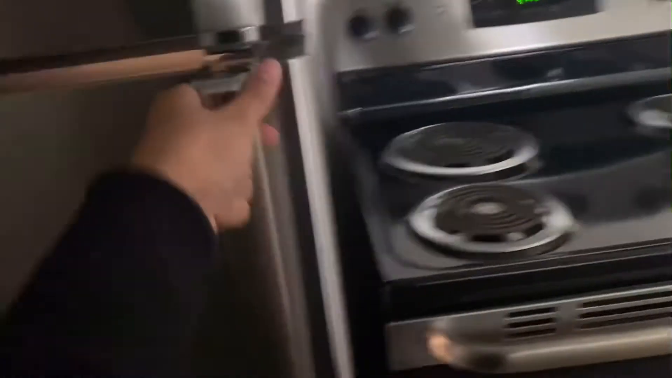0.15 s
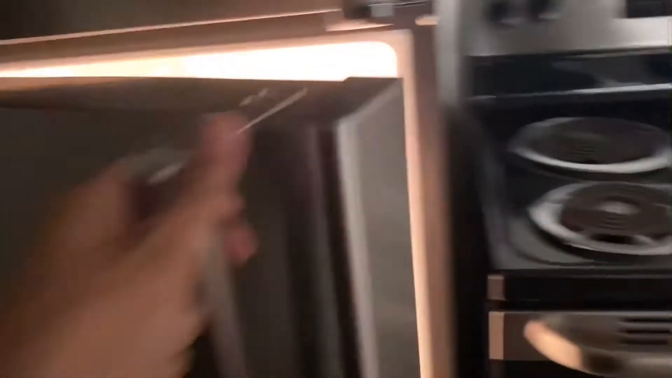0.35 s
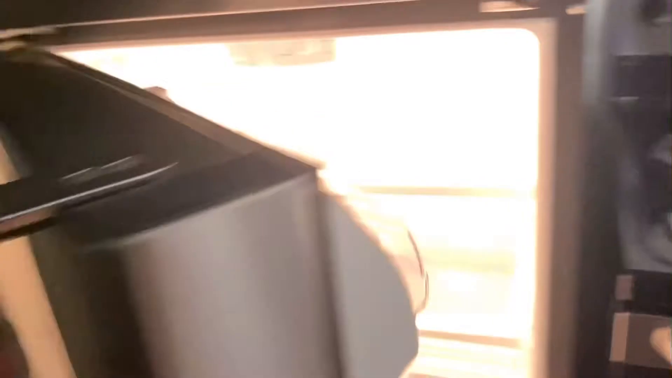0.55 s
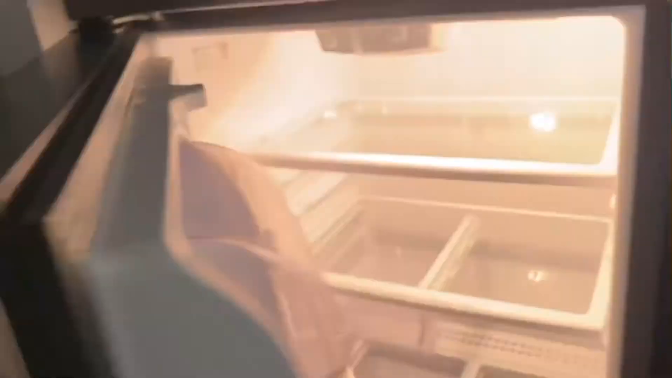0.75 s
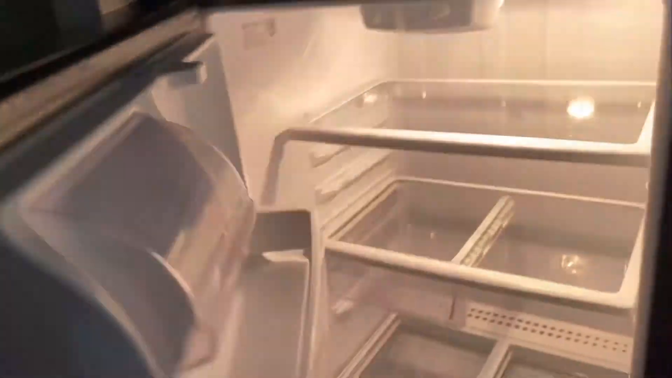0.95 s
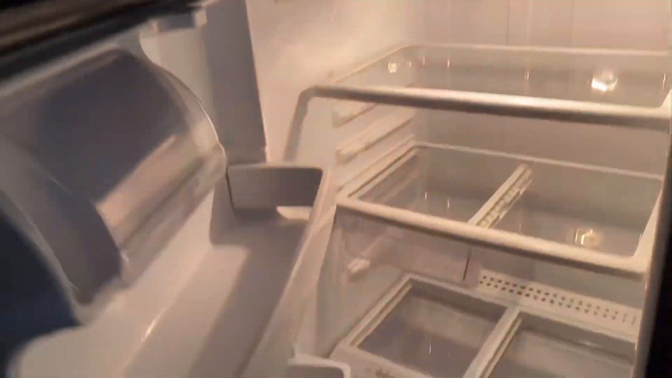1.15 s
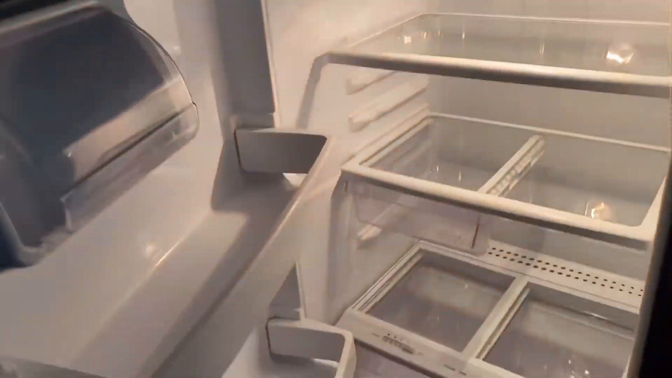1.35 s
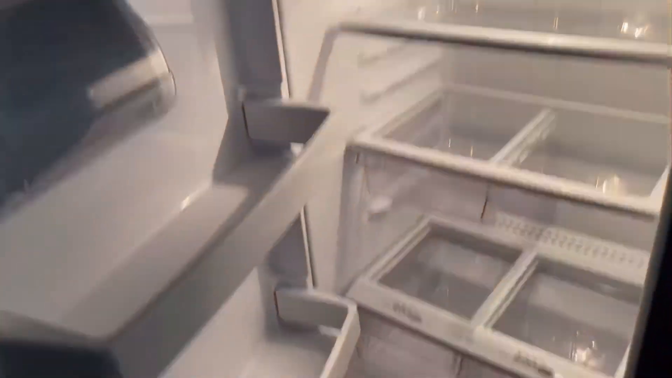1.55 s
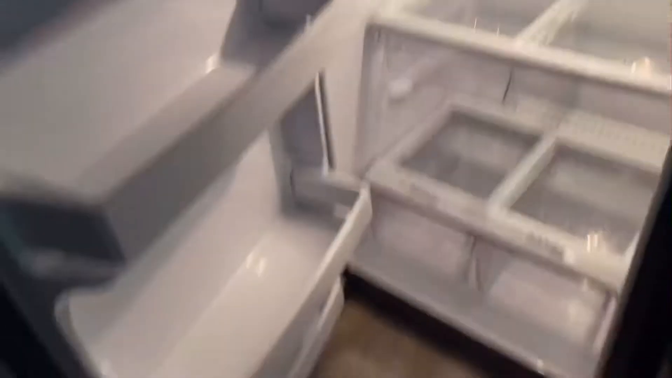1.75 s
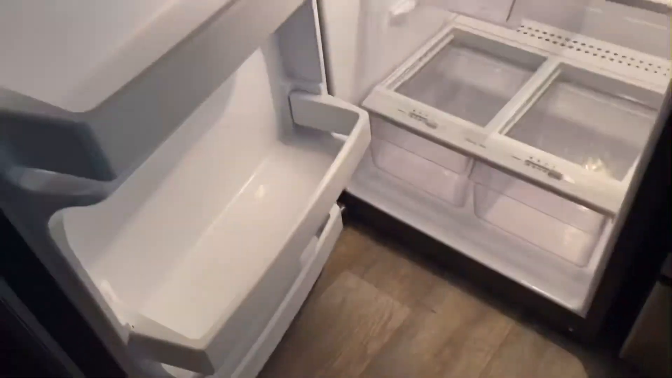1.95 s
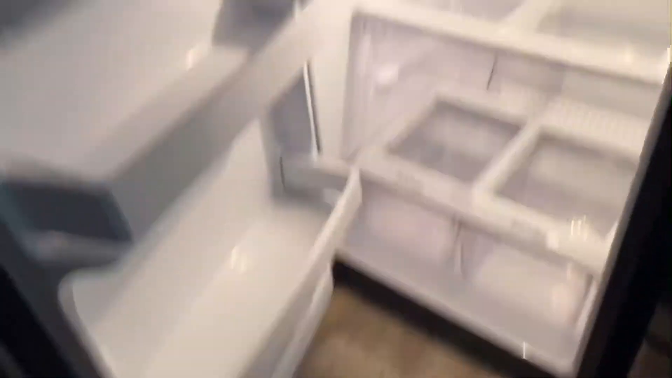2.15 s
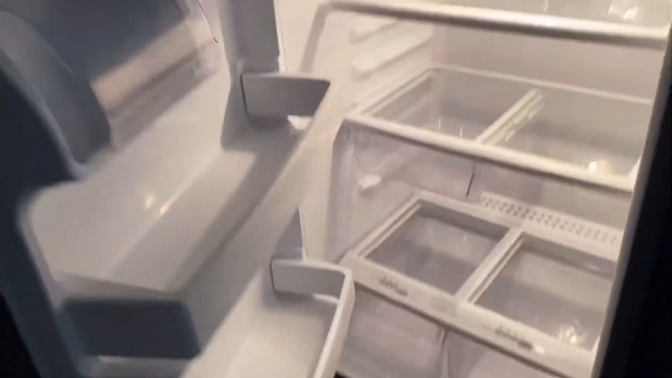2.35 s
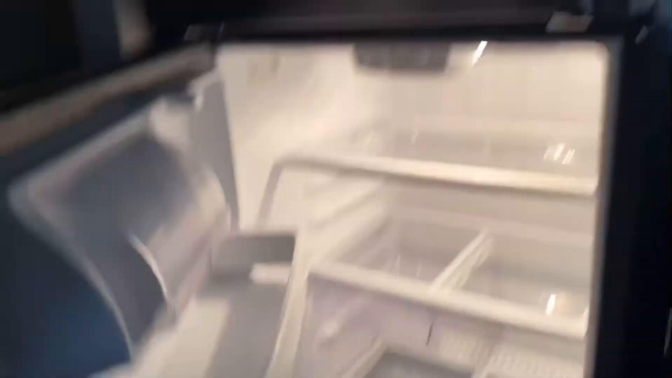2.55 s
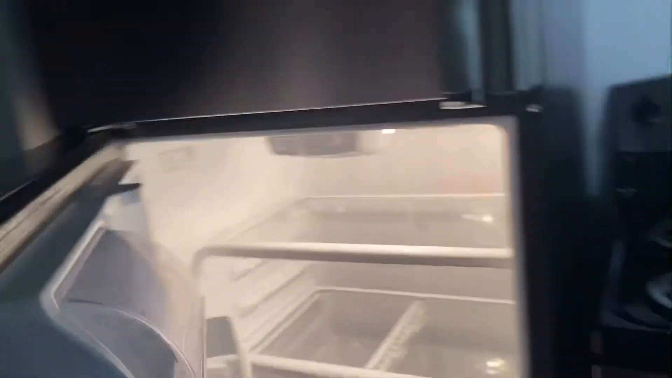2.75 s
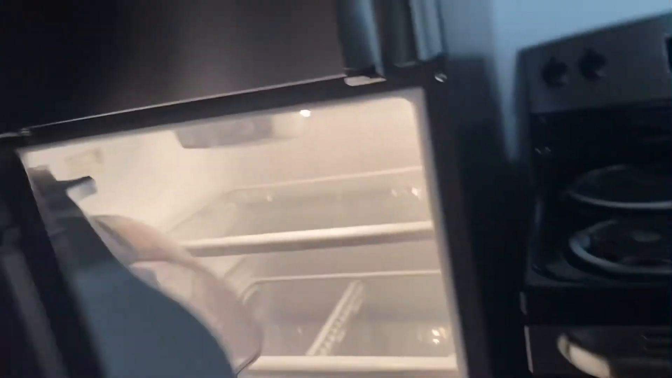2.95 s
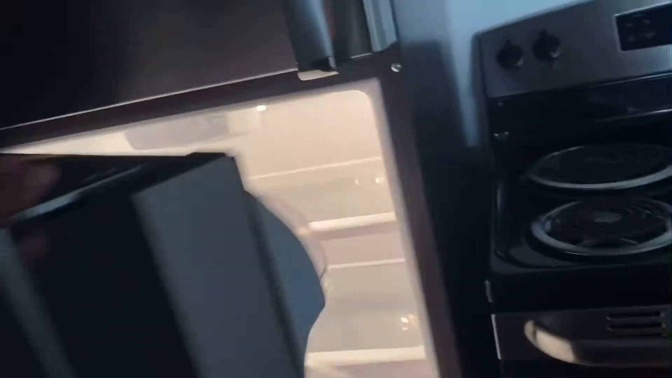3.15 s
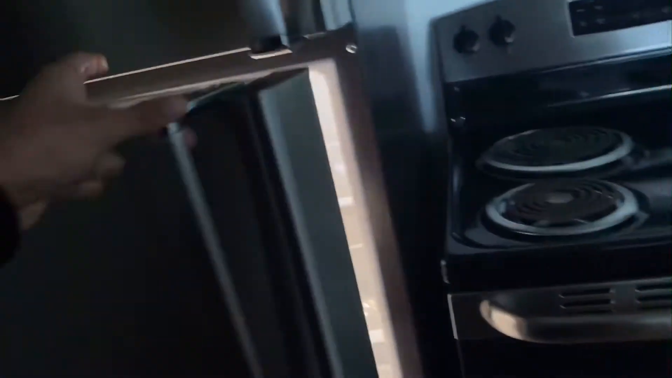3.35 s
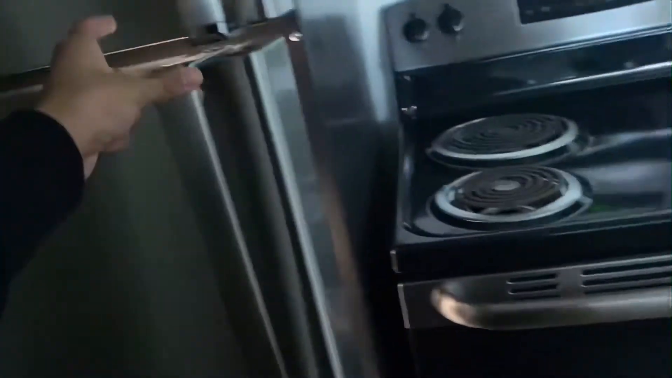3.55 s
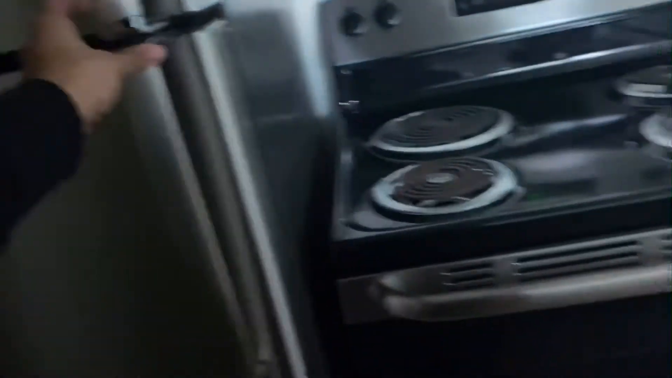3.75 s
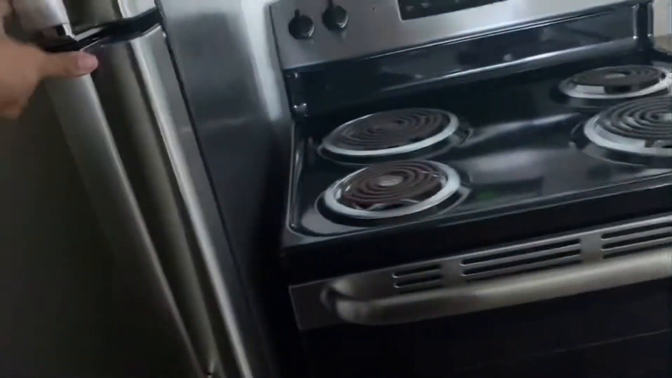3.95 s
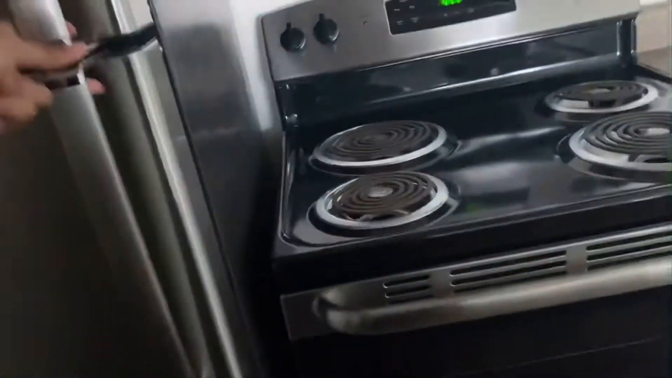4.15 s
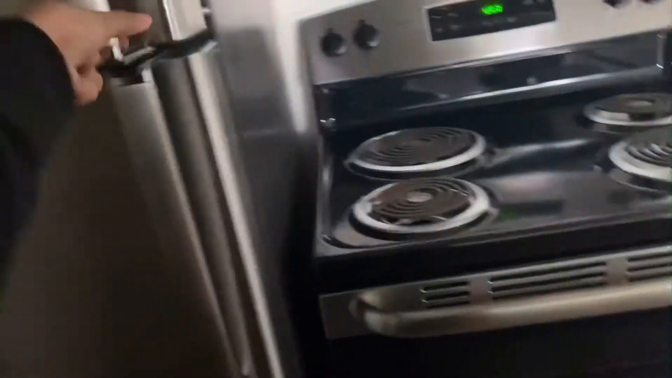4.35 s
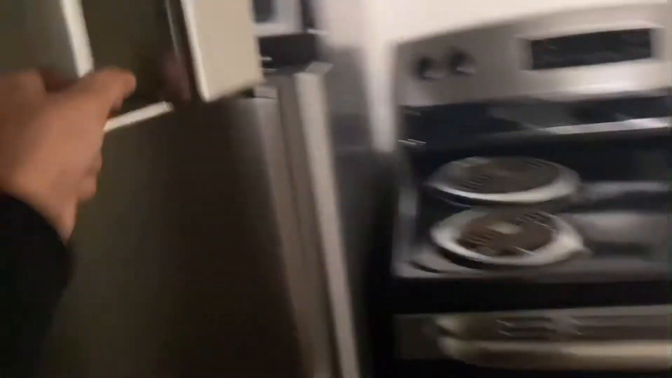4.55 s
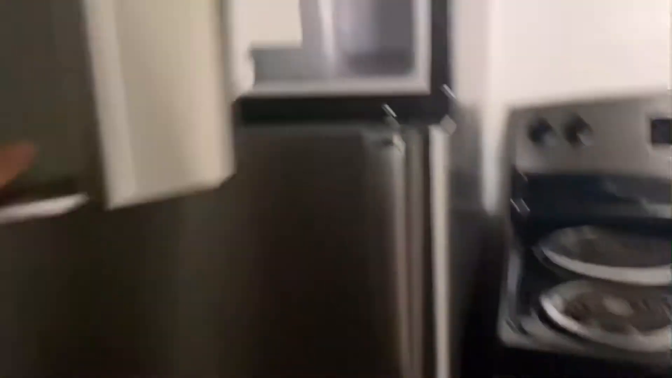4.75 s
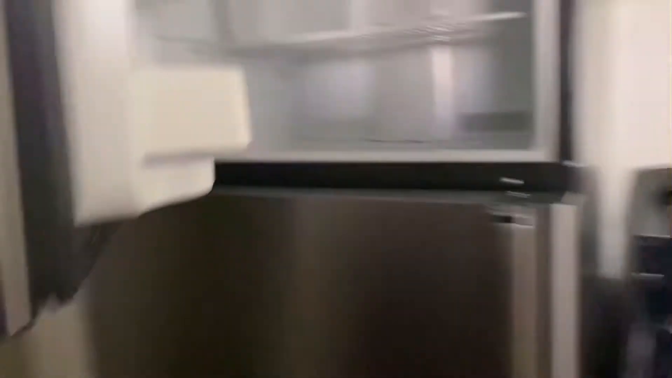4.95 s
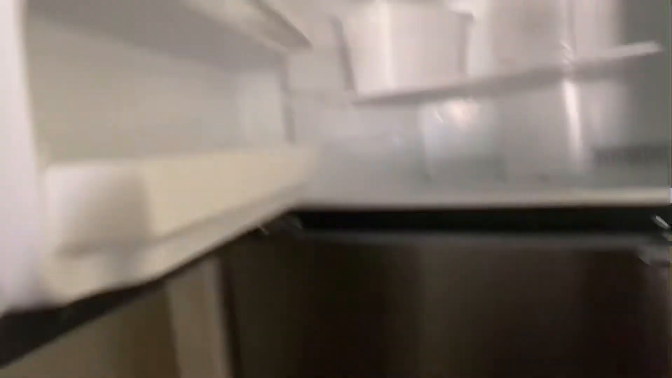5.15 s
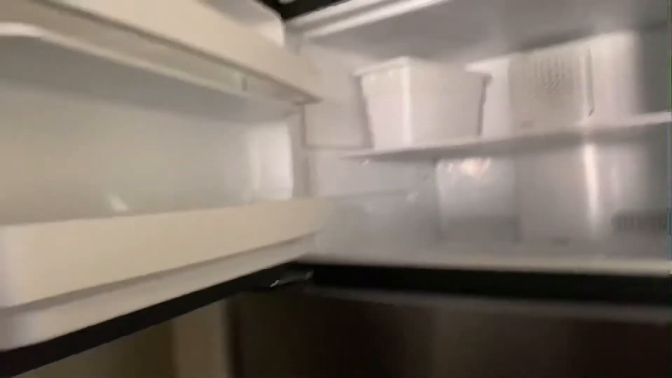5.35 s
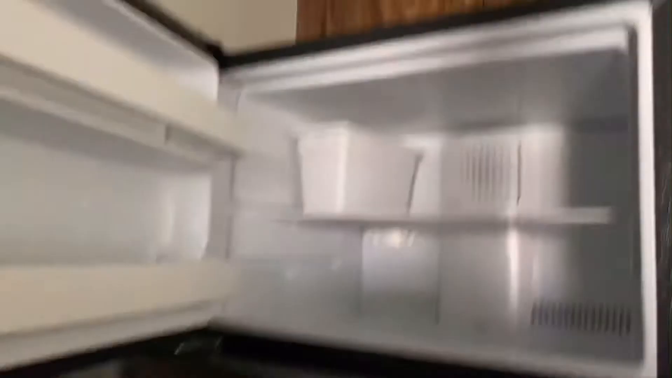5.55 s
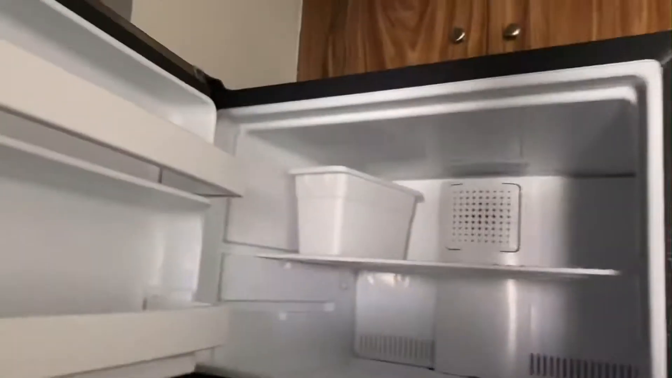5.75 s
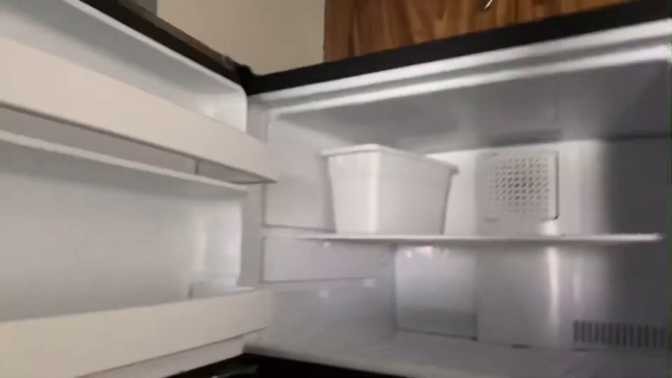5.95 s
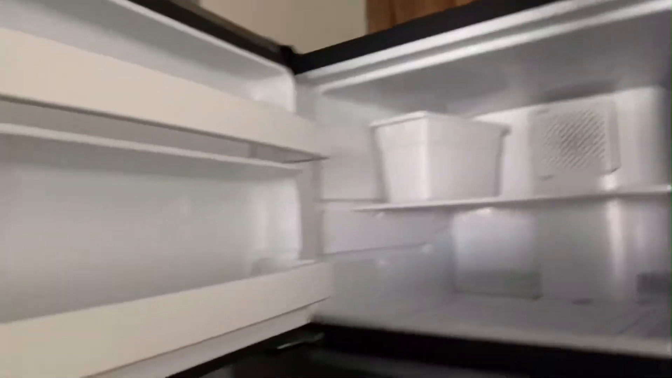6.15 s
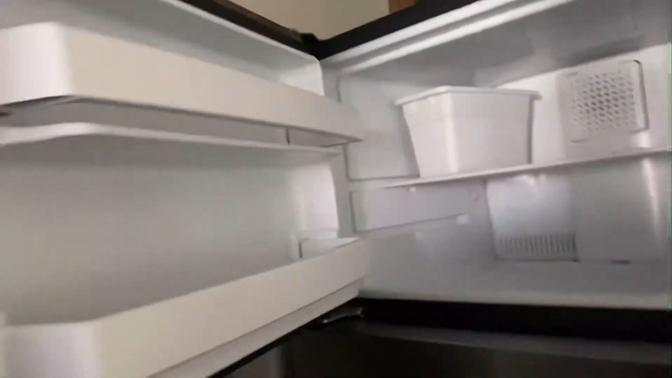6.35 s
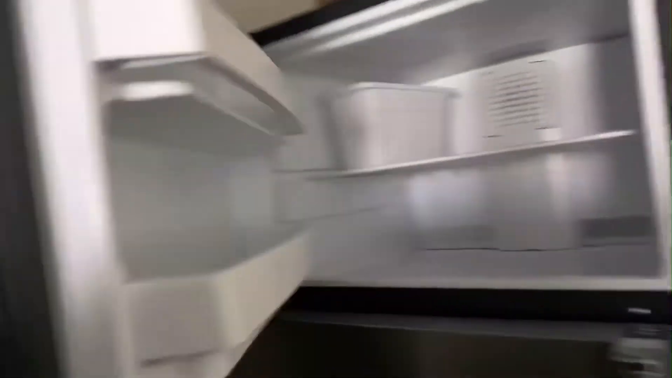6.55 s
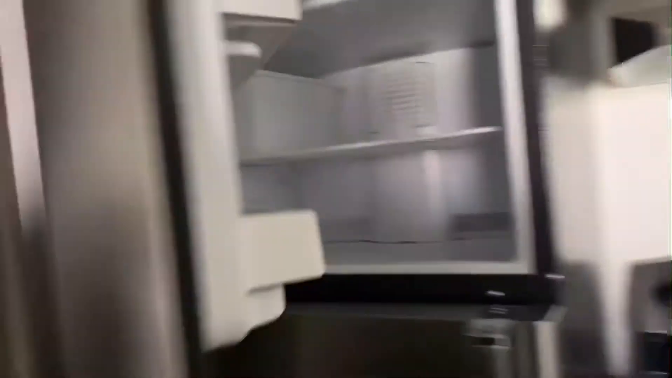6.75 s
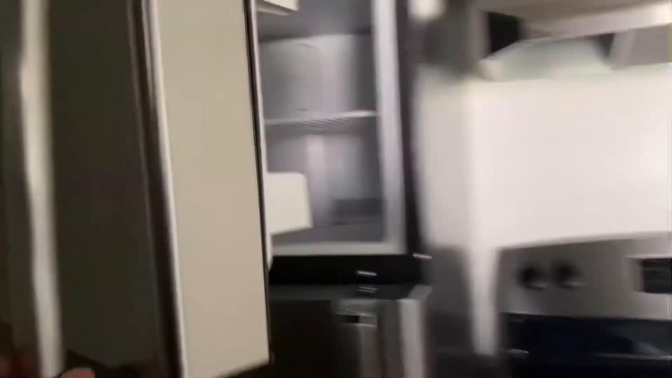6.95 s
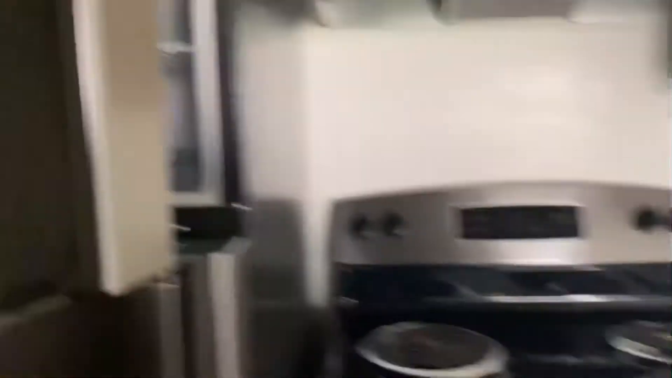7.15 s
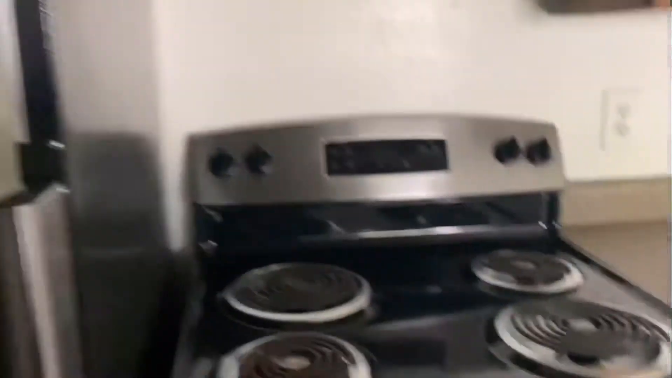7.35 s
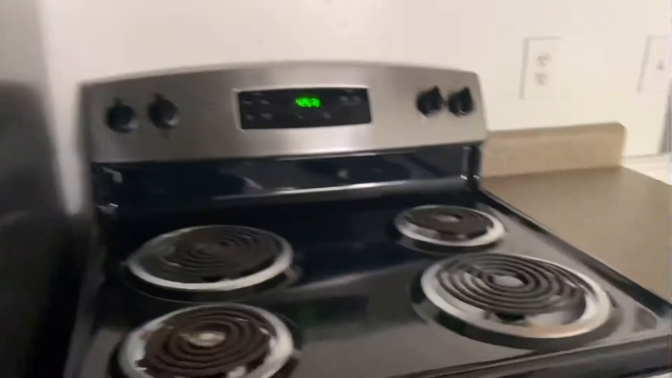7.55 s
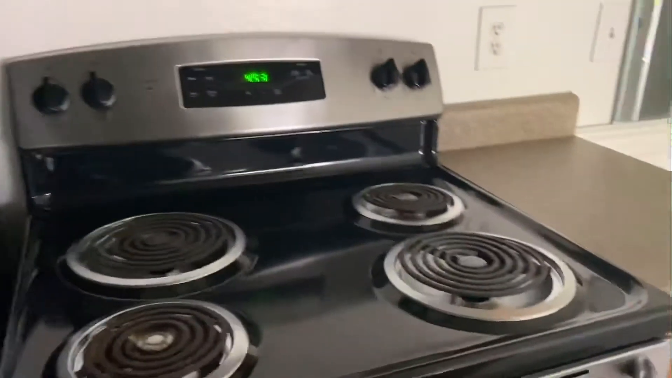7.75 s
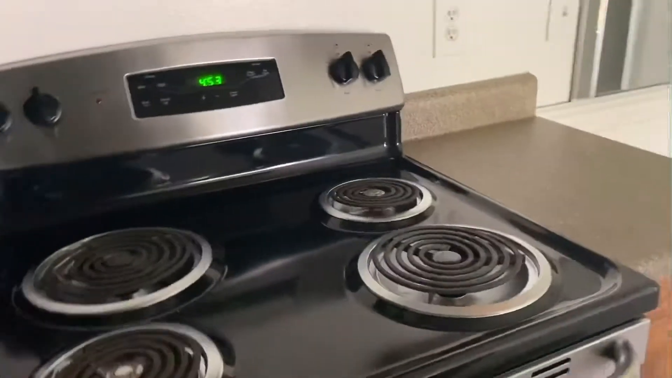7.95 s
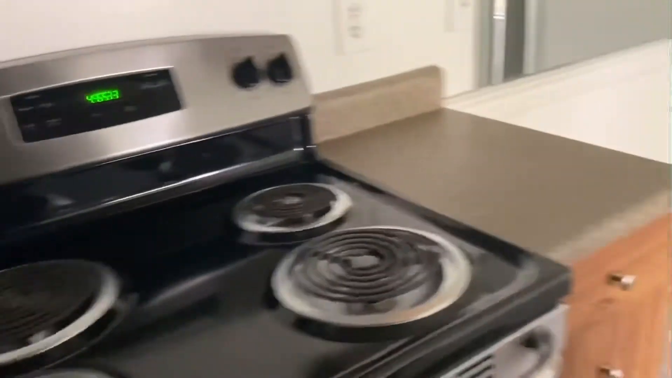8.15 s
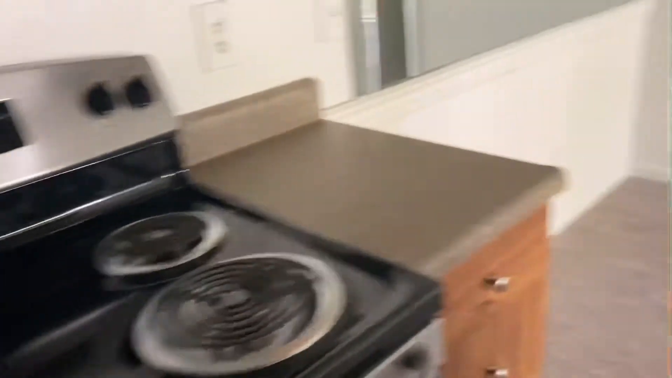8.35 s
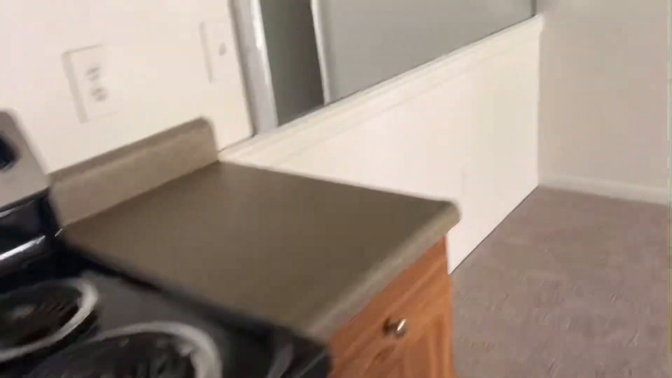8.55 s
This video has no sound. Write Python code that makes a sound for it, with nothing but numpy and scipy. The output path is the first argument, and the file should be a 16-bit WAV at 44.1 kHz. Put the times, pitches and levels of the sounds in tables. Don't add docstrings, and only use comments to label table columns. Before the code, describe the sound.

A bare, quiet kitchen heard close up in stereo, with low building rumble and soft room air. At 0.1 s the fridge opens with a dull low thud, a faint switch click and sleeve rustle. A thin, high shelf clink comes at 0.8 s, and a small plastic knock and tick at 1.2 s. Soft finger pats and muffled foot thuds follow from 1.5 to 2.6 s, then fine hinge ticks near 2.9 s. A palm pushes at 3.5 s, the switch clicks at 3.66 s, and at 3.72 s the fridge door slaps shut, loud and hollow, with shelf rattle and deep boom. At 4.27 s the freezer handle snaps brightly, followed by small plastic knocks and ticks until 4.9 s. It stays nearly quiet until a soft thud around 7.4 s. At 7.61 s the freezer slaps shut, brighter, with a short rattle and low boom, fading into rumble and slight rustle by 8.6 s.

```python
import sys
import numpy as np
from scipy import signal
from scipy.fft import rfft, irfft, next_fast_len
from scipy.io import wavfile
from scipy.ndimage import uniform_filter1d, map_coordinates

SR = 44100
rng = np.random.default_rng(int(sys.argv[2]) if len(sys.argv) > 2 else 0)


def materialize(psi):
    bounded = np.clip(np.atleast_2d(psi).T, -1, 1)
    quanta = np.round(bounded * 32767).astype(np.int16)
    wavfile.write(sys.argv[1], SR, quanta)


def nominal_scale(level):
    x = np.asarray(level, float) / 20
    return 10 ** x


N = 383405
AGE = np.arange(SR * 3 // 5) / SR


# t/s, peak level/dB, ring level/dB, shake level/dB, echo level/dB
FRIDGE_CLOSING = [
    (3.7171, -10.5, 0, -0.5, -3),
]
# f/Hz, level/dB, t60/s
FRIDGE_MODES = [(201.7, 0.5, 0.29), (244, -16, 0.14), (283, 3, 0.15), (359, -4.5, 0.22), (423, -4.5, 0.12),
                (544, -3.5, 0.24), (620, -3, 0.15), (738, -3.5, 0.092), (816, -11, 0.21), (990, -20, 0.13),
                (2660, -28, 0.081)]
# f/Hz, level/dB
FRIDGE_SLAP_COLOUR = [(60, -2.5), (200, 7.5), (560, 1), (1700, -13.5), (2600, -12.5), (3200, -20.5),
                      (7000, -30.5), (11000, -37.5), (16000, -50)]


def fridge_door(out):
    blows(out, FRIDGE_CLOSING, FRIDGE_MODES, FRIDGE_SLAP_COLOUR, gain_db=-4, bright_db=6.5, shake_t60=0.21)


# t/s, peak level/dB, ring level/dB, shake level/dB, echo level/dB
FREEZER_CLOSING = [
    (7.6098, -14, 0.61, 0.91, -3.5),
]
# f/Hz, level/dB, t60/s
FREEZER_MODES = [(294, 1, 0.13), (357.7, -4.5, 0.21), (428, -11, .2), (558, -8, 0.17), (724, 5.5, 0.032),
                 (830, -25, 0.17), (1096, -10, 0.26), (1176, -8.5, 0.16), (2460, -14, 0.058)]
# f/Hz, level/dB
FREEZER_SLAP_COLOUR = [(60, -15), (200, 1), (700, -6), (1000, -10), (2400, -10.5), (4500, -22),
                       (7300, -28.5), (11000, -32.5), (16000, -53)]


def freezer_door(out):
    blows(out, FREEZER_CLOSING, FREEZER_MODES, FREEZER_SLAP_COLOUR,
          gain_db=-2.5, bright_db=10.0, shake_t60=0.13)


# t/s, f/Hz, level/dB, t60/s, rise/s
CABINET_BOOMS = [
    (3.718, 64.4, -6, 0.12, 0.01),
    (3.717, 119.4, -13, 0.18, 0.01),
    (3.719, 173.5, -13.5, 0.33, 0.022),
    (7.613, 55.4, -8, 0.19, 0.0092),
    (7.611, 101, -7, 0.12, 0.0068),
    (7.609, 174, -15.5, 0.15, 0.003),
]


def cabinet_booms(out):
    swings(out, CABINET_BOOMS)


# t/s, f/Hz, level/dB, t60/s, rise/s
FRAME_SMACKS = [
    (3.72, 327, -10, .02, 0.00044),
    (7.6101, 2280, -11, 0.01, 0.00018),
    (7.612, 1800, -16, 0.012, 0.00022),
]


def frame_smacks(out):
    swings(out, FRAME_SMACKS)


# t/s, peak level/dB, f/Hz, width/octaves,
# t60/s
GASKET_BOUNCES = [(0.405, -46, 2800, .9, 0.014), (.845, -46, 5700, .03, 0.053),
                  (1.01, -59, 3100, 0.091, .08), (3.7194, -17, 500, 0.65, 0.013),
                  (3.735, -26, 2630, .1, 0.083), (3.76, -33, 2300, .2, 0.046), (4.799, -43, 2900, .4, .012),
                  (7.598, -42, 2500, 0.71, 0.051), (7.61, -14, 2500, 0.58, 0.009),
                  (7.6125, -15, 2210, 1.1, .01), (7.621, -25, 2300, 1.3, 0.015),
                  (7.625, -18.5, 725, 0.26, 0.054), (7.63, -35, 3230, 0.17, 0.027)]


def gasket_bounces(out):
    touches(out, GASKET_BOUNCES, gain_db=-3.5, rise=0.00065, echo_db=-2.5)


# t/s, peak level/dB, ring level/dB, shake level/dB, echo level/dB
HANDLE_SNAPS = [
    (4.2692, -21.5, 2, -2.5, -3),
]
# f/Hz, level/dB, t60/s
HANDLE_MODES = [(880, -16, 0.1), (1546, -8, 0.066), (2510, 0, 0.064), (3090, -9, .05), (3900, 0, 0.069),
                (4020, -6, 0.056), (5130, -16, .04), (6730, -14, 0.16), (7330, -5, .06), (8400, -8, .04),
                (11600, -8, 0.064)]
# f/Hz, level/dB
HANDLE_COLOUR = [(350, -30), (700, -18), (2500, 2), (4000, 3), (5500, -7), (7500, 5), (11000, -4.5),
                 (16000, -3.5)]


def freezer_handle(out):
    blows(out, HANDLE_SNAPS, HANDLE_MODES, HANDLE_COLOUR, gain_db=-6.5, bright_db=10.0, shake_t60=0.11)


# t/s, peak level/dB, ring level/dB, shake level/dB, echo level/dB
SWITCH_CLICKS = [
    (0.092, -37, 5, -1.5, -1),
    (3.6562, -27.5, 8.5, -3, -3),
]
# f/Hz, level/dB, t60/s
SWITCH_MODES = [(2250, 1.5, .04), (2540, -1.5, .025), (2740, -14, 0.018), (4670, -13, 0.041),
                (6200, -14, 0.028)]
# f/Hz, level/dB
SWITCH_COLOUR = [(300, -28), (900, 1), (1600, -2), (2400, 10), (3500, -12), (5000, -15), (8000, -21),
                 (16000, -30)]


def light_switch(out):
    blows(out, SWITCH_CLICKS, SWITCH_MODES, SWITCH_COLOUR, gain_db=-9.0, bright_db=4.0, shake_t60=0.064)


# t/s, peak level/dB, ring level/dB, shake level/dB, echo level/dB
SHELF_CLINKS = [
    (0.8226, -34, -2, -7, -1.5),
    (.995, -49, -4, -1.5, 3.5),
]
# f/Hz, level/dB, t60/s
SHELF_MODES = [(3140, -11, .05), (4420, -6, .05), (4940, 7.5, 0.035), (5700, -7, .08), (6040, -1, 0.031),
               (8670, 8, .06), (10900, -12, 0.046), (11400, -11, .06), (14400, 3, .06)]
# f/Hz, level/dB
SHELF_COLOUR = [(900, -18), (2400, -14), (5000, -5), (8000, -1.5), (11000, -1.5), (14600, -5), (16500, -14)]


def shelf_clinks(out):
    blows(out, SHELF_CLINKS, SHELF_MODES, SHELF_COLOUR, gain_db=-1, bright_db=-3.0, shake_t60=0.077)


# t/s, peak level/dB, f/Hz, width/octaves, t60/s
PLASTIC_KNOCKS = [(.094, -44, 2240, 0.41, 0.085), (.148, -55, 2250, 0.23, .04),
                  (.975, -55.5, 4440, 0.081, 0.12), (1.1585, -45.5, 2800, 0.57, 0.052),
                  (1.162, -48, 1040, 0.59, 0.059), (4.305, -44, 2900, .4, 0.044),
                  (4.345, -48, 2900, .4, 0.046), (4.398, -46, 2925, 0.5, 0.05),
                  (4.66, -62, 2360, 0.55, 0.69), (4.5915, -43, 2650, 0.33, 0.022)]


def plastic_knocks(out):
    touches(out, PLASTIC_KNOCKS, gain_db=0, rise=0.00081, echo_db=-5)


# t/s, peak level/dB, f/Hz
HINGE_TICKS = [(0.406, -53, 6930), (1.1585, -38, 6640), (2.8983, -51, 6270), (2.9157, -48, 10600),
               (2.9808, -47, 6040), (3.5389, -57, 6400), (3.6321, -60, 6180), (3.7933, -36, 6520),
               (3.934, -38.5, 10900), (4.591, -59, 7480), (4.7074, -60, 6260), (4.799, -37.5, 7700),
               (4.9018, -55, 6380)]


def hinge_ticks(out):
    touches(out, HINGE_TICKS, gain_db=2, rise=0.00041, echo_db=-6.5, width=1.0, t60=0.01)


# t/s, peak level/dB, f/Hz
SEAL_PEELS = [
    (3.698, -39.5, 12500),
    (4.238, -49.5, 10430),
    (6.28, -72, 12000),
]


def seal_peels(out):
    touches(out, SEAL_PEELS, gain_db=2.5, rise=0.002, echo_db=3.5, width=.8, t60=0.035)


# t/s, peak level/dB, f/Hz
PALM_PUSHES = [
    (3.545, -30.5, 800),
    (3.657, -29, 1100),
    (4.24, -41, 2200),
    (4.275, -31.5, 550),
]


def palm_pushes(out):
    touches(out, PALM_PUSHES, gain_db=-3.5, rise=0.013, echo_db=3.5, width=1.02, t60=0.082)


# t/s, peak level/dB, f/Hz
FINGER_TAPS = [(1.546, -36, 400), (1.808, -40, 500), (1.995, -46.5, 662), (2.139, -39, 400),
               (2.552, -34.5, 620), (4.25, -29, 556), (7.389, -38.5, 614)]


def finger_taps(out):
    touches(out, FINGER_TAPS, gain_db=-4, rise=0.0025, echo_db=2.0, width=0.57, t60=0.057)


# t/s, peak level/dB, f/Hz, t60/s
FOOT_THUDS = [(0.129, -21.5, 56.5, 0.12), (1.565, -27.5, 72.7, 0.21), (1.768, -30, 67.3, .086),
              (2.126, -30.5, 121, 0.35), (3.845, -29, 190, .093), (5.24, -35, 83.4, 0.12),
              (7.449, -28.5, 88.8, 0.14), (8.04, -33, 94.2, .13)]


def foot_thuds(out):
    touches(out, FOOT_THUDS, gain_db=-4, rise=0.033, echo_db=-9.5, width=1.45)


# t/s, f/Hz, level/dB, t60/s, rise/s
FLOOR_SWINGS = [(.095, 52.6, -26.5, .3, .04), (1.57, 74.5, -29, .2, .03), (1.765, 68, -25.5, .14, .012),
                (2.138, 116, -32.5, .2, .006), (2.14, 293, -40, .2, 0.0073), (4.28, 61.4, -30, 0.35, .03),
                (5.245, 70, -33, .12, .01), (7.44, 90, -31, .15, .015)]


def floor_swings(out):
    swings(out, FLOOR_SWINGS)


# middle t/s, half length/s, level/dB
ARM_STROKES = [(0.0, 0.068, -63.5), (.45, 0.53, -77.5), (1.004, 0.071, -72), (1.2, 0.13, -75.5),
               (2.17, 0.087, -83), (2.844, 0.25, -73), (3.37, 0.15, -67.5), (3.762, 0.11, -62),
               (4.02, .17, -69), (4.4, 0.16, -69.5), (4.764, 0.19, -71.5), (6.335, .08, -82),
               (6.85, 0.091, -84), (1.65, .15, -84), (7.192, 0.25, -76), (7.78, 0.17, -68),
               (8.1, .2, -80.5), (8.6, 0.3, -79)]


def arm_strokes():
    t = np.arange(N) / SR
    return sum(nominal_scale(db - 10 * ((t - s) / half) ** 2) for s, half, db in ARM_STROKES)


# f/Hz, level/dB
CLOTH_COLOUR = [(1500, -34), (4000, 2.5), (7500, -2), (11000, -4), (14000, -7), (15500, -17), (16500, -24)]


def sleeve(strokes):
    flutter_db = .7 * wobble(14)
    cloth = nominal_scale(2.0 + flutter_db) * hiss(CLOTH_COLOUR, patchy_db=1.4)
    resting = nominal_scale(-80.5) * filtered(cloth, lambda hz: 1 / (1 + (hz / 13500) ** 6))
    return .9 * resting + strokes * cloth


# t/s, air level/dB, rumble level/dB
DOOR_HUMS = [
    (0.0, -49.5, -41.5),
    (3.72, -42, -48),
    (7.63, -45, -36.5),
]


def door_hums():
    t = np.arange(N) / SR
    air_hum, low_hum = np.zeros((2, N))
    for s, air_db, low_db in DOOR_HUMS:
        decay = nominal_scale(-60 * np.abs(t - s) / 1.45)
        fading = decay * (1 - np.exp(-np.maximum(t - s + .005, 0) / 0.034))
        air_hum = air_hum + nominal_scale(air_db) * fading
        low_hum = low_hum + nominal_scale(low_db) * fading
    return air_hum, low_hum


# f/Hz, level/dB
AIR_COLOUR = [(210, -28.5), (350, -0.5), (394, -8.5), (494, -6), (611, -14), (850, -7.5), (1090, -16.5),
              (1630, -19.5), (2420, -22), (7080, -41), (8300, -50), (10800, -71), (18300, -120)]


def room_air(strokes, air_hum):
    stirred = np.hypot(air_hum, nominal_scale(9) * strokes)
    sway_db = .3 * wobble(4)
    return np.hypot(nominal_scale(-56.5), stirred) * nominal_scale(sway_db) * hiss(AIR_COLOUR, patchy_db=1.16)


# f/Hz, level/dB
RUMBLE_COLOUR = [(13, -48.5), (22, -24), (43, -3), (91, 0), (116, -1), (134, -26), (162, -2), (204, -10),
                 (298, -5.5), (335, -8.5), (365, -11), (495, -17), (700, -22), (910, -48.5), (1540, -120)]


def building_rumble(low_hum):
    lumps_db = 1.3 * wobble(9)
    return np.hypot(nominal_scale(-45.5), low_hum) * nominal_scale(lumps_db) * hiss(RUMBLE_COLOUR, patchy_db=.8)


# f/Hz, t60/s
KITCHEN_T60 = [(60, 0.85), (250, 0.51), (1000, 0.51), (4000, 0.47), (12000, 0.34)]


def kitchen_tail():
    hz, t, z = signal.stft(rng.standard_normal((2, len(AGE))), SR, nperseg=256)
    decay = nominal_scale(-60 * t / along(KITCHEN_T60, hz)[:, None])
    pair = signal.istft(z * decay, SR, nperseg=256)[1][:, :len(AGE)]
    return pair / np.linalg.norm(pair[0])


def blows(out, events, body, spectrum, gain_db, bright_db, shake_t60):
    hz, level, t60 = np.transpose(body)[:, :, None]
    for s, db, ring_db, shake_db, echo_db in events:
        turn = rng.random((len(body), 1)) * np.array([0, 1])[:, None, None]
        wander = 9e-7 * hz * np.cumsum(rng.standard_normal((len(body), len(AGE))), axis=1)
        modes = nominal_scale(level - 60 * AGE / t60) * np.sin(2 * np.pi * (hz * AGE + turn + wander))
        ring = modes.sum(axis=1) / np.linalg.norm(nominal_scale(level)) * (1 - np.exp(-AGE / 0.00033))
        echo = signal.fftconvolve(ring[:1], kitchen_tail(), axes=1)[:, :len(AGE)]
        ring = ring + nominal_scale(echo_db) * echo
        bright = lambda f: along(spectrum, f) + bright_db * np.log2(f + 100)
        crack = puff(bright, 0.013, 0.00013, echo_db)
        shake = puff(lambda f: along(spectrum, f), shake_t60, 0.0024, echo_db)
        add(out, s, nominal_scale(db + gain_db) * (crack + nominal_scale(ring_db) * ring + nominal_scale(shake_db) * shake))


def touches(out, events, gain_db, rise, echo_db, width=None, t60=None):
    for s, db, hz, *own in events:
        octaves, life = width or own[-2], t60 or own[-1]
        bell = lambda f: np.maximum(-6 * (np.log2((f + 1) / hz) / octaves) ** 2, -65)
        add(out, s, nominal_scale(db + gain_db) * puff(bell, life, rise, echo_db))


def swings(out, events):
    phase = np.array([[0], [1.1]])
    for s, hz, db, t60, rise in events:
        envelope = nominal_scale(db - 60 * AGE / t60) * (1 - np.exp(-AGE / rise))
        swing = -envelope * np.sin(2 * np.pi * hz * AGE + phase)
        add(out, s, swing * np.array([[1], [.8]]))


def puff(colour_db, t60, rise, echo_db):
    colour = lambda hz: nominal_scale(colour_db(hz))
    shape = nominal_scale(-60 * AGE / t60) * (1 - np.exp(-AGE / rise))
    noise = filtered(rng.standard_normal((2, len(AGE))), colour)
    burst = unit(noise * shape) * np.sqrt(np.mean(shape ** 2))
    echo = filtered(kitchen_tail(), colour) * (1 - np.exp(-AGE / (0.0006 + 0.086 * t60)))
    return burst + nominal_scale(echo_db) * echo * np.linalg.norm(burst[0]) / np.linalg.norm(echo[0])


def hiss(spectrum, patchy_db):
    z = signal.stft(rng.standard_normal((2, N)), nperseg=512)[2]
    field = uniform_filter1d(rng.standard_normal(z.shape[1:]), size=4, axis=0)
    field = uniform_filter1d(field, size=10, axis=1)
    pair = signal.istft(z * nominal_scale(patchy_db * unit(field)), nperseg=512)[1][:, :N]
    return unit(filtered(pair, lambda hz: nominal_scale(along(spectrum, hz))))


def wobble(rate):
    return map_coordinates(rng.standard_normal(int(N * rate / SR) + 4), [np.arange(N) * rate / SR])


def filtered(x, response):
    n = x.shape[-1]
    m = next_fast_len(n + 8192)
    return irfft(rfft(x, m) * response(np.fft.rfftfreq(m, 1 / SR)), m)[..., :n]


def along(points, hz):
    f, v = np.transpose(points)
    return np.interp(np.log(hz + 1), np.log(f + 1), v)


def unit(x):
    return x / np.sqrt(np.mean(x ** 2) + 1e-20)


def add(out, s, x):
    part = out[:, round(s * SR):][:, :x.shape[1]]
    part += x[:, :part.shape[1]]


def scene():
    strokes = arm_strokes()
    air_hum, low_hum = door_hums()
    out = building_rumble(low_hum) + room_air(strokes, air_hum) + sleeve(strokes)
    for source in (fridge_door, freezer_door, cabinet_booms, frame_smacks, gasket_bounces,
                   freezer_handle, light_switch, shelf_clinks, plastic_knocks, hinge_ticks, seal_peels,
                   palm_pushes, finger_taps, foot_thuds, floor_swings):
        source(out)
    return out


# f/Hz, level/dB
PORT_DIFFERENCE = [(30, -14.5), (130, -11), (300, -6), (650, 1), (1400, 2.5), (3000, -5.5), (6000, -1.5)]


def two_ports(dry):
    top_hz = 15800
    lagged = lambda hz: np.clip((hz - 5600) / 1000, 0, 1)
    half = lambda hz: -np.pi * (hz - 7015) / 4000
    in_step = lambda hz: 1 - lagged(hz) + lagged(hz) * np.cos(half(hz))
    mid = filtered(dry[0], lambda hz: in_step(hz) * (hz < top_hz))
    side = filtered(dry[0], lambda hz: lagged(hz) * 1j * np.sin(half(hz)) * (hz < top_hz) + 0.037)
    by_chance = lambda hz: (1 - lagged(hz)) * nominal_scale(along(PORT_DIFFERENCE, hz))
    side = side + filtered(dry[1], by_chance)
    return np.array([mid + side, mid - side])


def band_limit(x):
    return signal.sosfilt(signal.butter(12, 16820, fs=SR, output="sos"), x)


def record(dry):
    mix = two_ports(dry)
    return band_limit(mix)


dry = scene()
out = record(dry)
materialize(out)
```